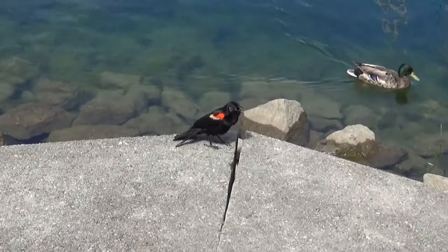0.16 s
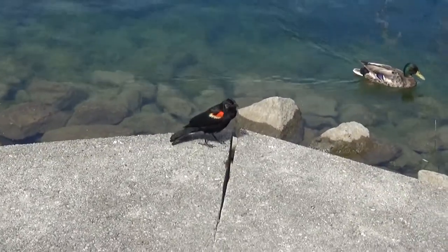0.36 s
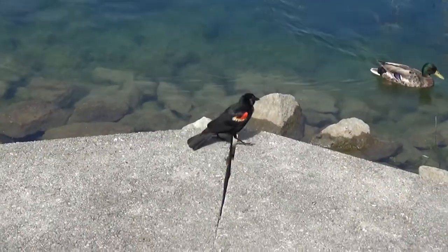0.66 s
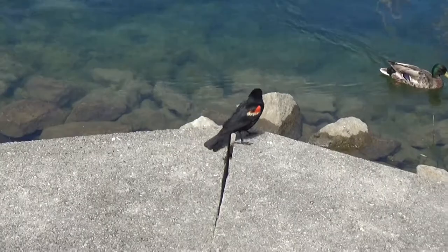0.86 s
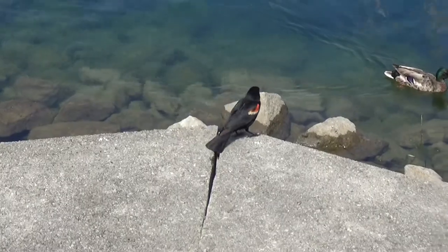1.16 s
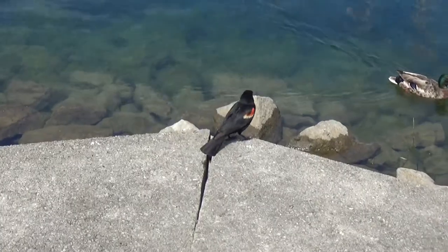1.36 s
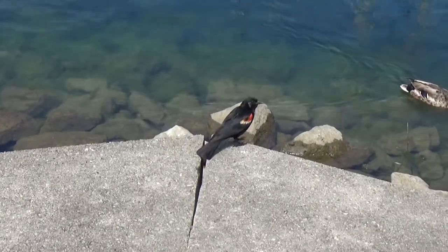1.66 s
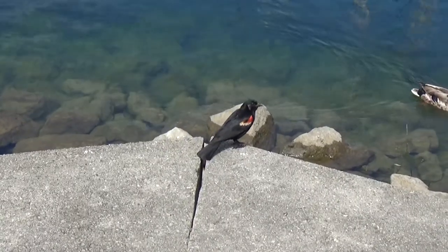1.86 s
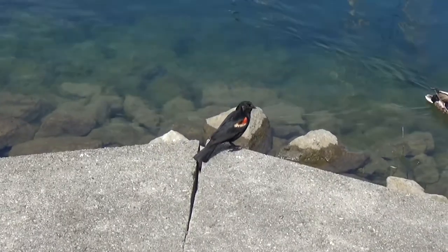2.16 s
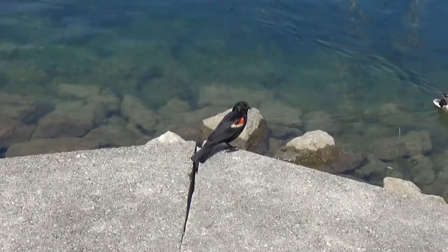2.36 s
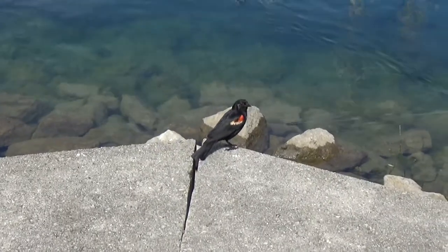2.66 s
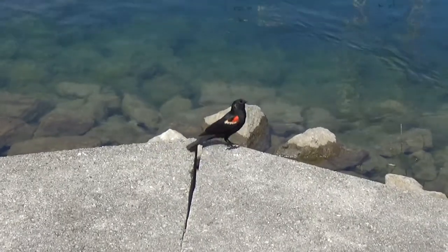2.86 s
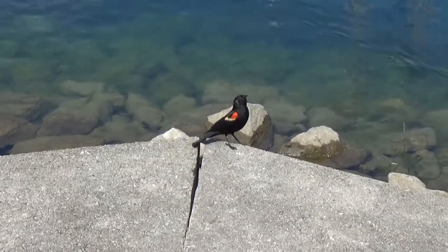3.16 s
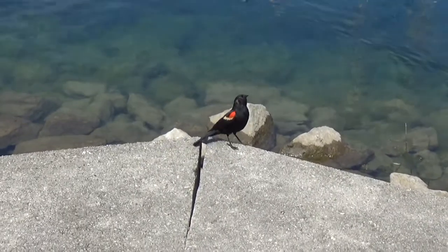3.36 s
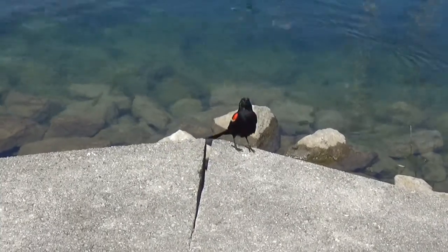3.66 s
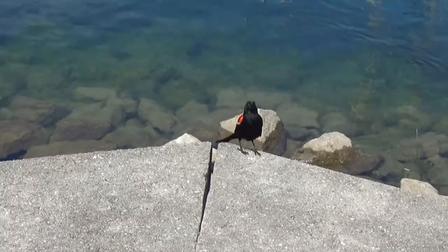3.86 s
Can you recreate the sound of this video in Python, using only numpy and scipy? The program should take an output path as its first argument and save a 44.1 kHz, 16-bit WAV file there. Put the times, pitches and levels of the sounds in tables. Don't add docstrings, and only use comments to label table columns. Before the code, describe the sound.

A close blackbird's loud, metallic buzzing trill is already under way and stops within a quarter second, echoing briefly off stone; afterwards quiet far traffic rumble, soft wind bumps, faint chirps and small laps, on a small camera microphone.

```python
import sys
import numpy as np
from scipy import signal
from scipy.fft import rfft, irfft
from scipy.io import wavfile
from scipy.ndimage import uniform_filter1d

SR = 44100
rng = np.random.default_rng(int(sys.argv[2]) if len(sys.argv) > 2 else 0)


def waveform_to_disk(signal):
    frames = np.transpose(np.atleast_2d(signal))
    scaled = np.clip(frames, -1, 1) * 32767
    samples = np.round(scaled).astype(np.int16)
    wavfile.write(sys.argv[1], SR, samples)


def linear_from_db(decibels):
    return 10 ** (np.asarray(decibels, float) / 20)


N = 176400
LEAD_S = 0.3


def evened(x):
    return x / np.sqrt(np.mean(x ** 2) + 1e-20)


def read(points, hz):
    f, value = np.transpose(points)
    return np.interp(np.log(hz + 1), np.log(f + 1), value)


def add(mix, s, sound):
    at = round(s * SR)
    sound = sound[..., max(-at, 0):]
    part = mix[..., max(at, 0):][..., :sound.shape[-1]]
    part += sound[..., :part.shape[-1]]


def panned(x, side_db):
    return x * linear_from_db(np.array([[side_db], [-side_db]]))


def resonate(x, hz, width_hz):
    turn = np.exp(2j * np.pi * hz * np.arange(x.shape[-1]) / SR)
    r = np.exp(-np.pi * width_hz / SR)
    return 2 * (turn * signal.lfilter([1 - r], [1, -r], x / turn)).real


def resonate_twice(x, hz, width_hz):
    return resonate(resonate(x, hz, width_hz), hz, width_hz)


def whistle(length_s, from_hz, to_hz, level_db, partials_db, bend, edge, rough):
    u = np.linspace(0, 1, max(round(length_s * SR), 8))
    glide_hz = to_hz + (from_hz - to_hz) * (1 - u) ** bend
    phase = 2 * np.pi * (np.cumsum(glide_hz) / SR + rng.random())
    noise = evened(uniform_filter1d(rng.standard_normal(2000), size=40))
    flutter = 1 + rough * noise[np.arange(len(u)) % 2000]
    shape = np.sin(np.pi / 2 * np.clip(np.minimum(u, 1 - u) / edge, 0, 1)) ** 2
    tone = sum(linear_from_db(db) * np.cos((k + 1) * phase) for k, db in enumerate(partials_db))
    return linear_from_db(level_db) * shape * flutter * tone


# [t/s, effort/dB]
TRILL_FIGURES = [(-.0214, 0), (0.0, 0), (.0213, 0), (.0428, 0), (.0643, 0), (.0858, -.5), (.1073, -.5),
                 (.1288, -.5), (.15, 0), (.1702, -.5), (.1903, -.5), (.2088, -1.5), (.227, -99)]
# [start/share, length/share, from f/Hz, to f/Hz, level/dB]
WHISTLED_NOTES = [
    (.25, .2, 5150, 3500, -12),
    (.41, .13, 3300, 4200, -18),
    (.46, .175, 2420, 3900, -10.5),
    (.52, .14, 4300, 5000, -21),
    (.565, .29, 2650, 3000, -15),
    (.62, .17, 5850, 6100, -30),
    (.735, .19, 5550, 3400, -10.5),
]
# [start/share, length/share, from f/Hz, to f/Hz, level/dB]
REEDY_NOTE = (-.16, .54, 1605, 1670, -19)
REEDY_PARTIALS = [-21.5, -3, 0, -42]
WHISTLE_PARTIALS = [0, -33, -46.5]
# [f/Hz, level/dB]
THROAT_GAIN = [(1400, -8), (1600, 0), (1760, 0), (1980, -9), (2400, 0), (5350, 1), (5600, -4), (5900, 0)]
# [f/Hz, level/dB per Hz]
BEAK_AIR = [(6300, 4.5), (8000, 0), (10100, 6.5), (12400, -19.5), (14500, -3.5)]


def trill():
    period_s, jitter_db, pitch_jitter = 0.0214, 0.9, 0.012
    close_s, close_db_per_s, rasp_db = 0.2125, -1600, -47.5
    first_s, first_db = TRILL_FIGURES[0]
    rows = [(first_s - k * period_s, first_db) for k in range(12, 0, -1)] + list(TRILL_FIGURES)
    notes = [(REEDY_NOTE, REEDY_PARTIALS)] + [(note, WHISTLE_PARTIALS) for note in WHISTLED_NOTES]
    out = np.zeros(SR)
    for (start, effort_db), (end, _) in zip(rows, rows[1:]):
        span = end - start
        for (at, share, from_hz, to_hz, db), partials in notes:
            pitch, force = rng.standard_normal(2)
            tune = 1 + pitch_jitter * pitch
            level_db = db + effort_db + jitter_db * force
            note = whistle(share * span, from_hz * tune, to_hz * tune, level_db, partials,
                           bend=1.8, edge=0.4, rough=0.12)
            add(out, LEAD_S + start + at * span, note)
    hz = np.fft.rfftfreq(SR, 1 / SR)
    out = irfft(rfft(out) * linear_from_db(read(THROAT_GAIN, hz)))
    band = (hz > 6300) & (hz < 15100)
    air = evened(irfft(rfft(rng.standard_normal(SR)) * linear_from_db(read(BEAK_AIR, hz)) * band))
    push = np.sqrt(abs(uniform_filter1d(out ** 2, size=100)))
    out += linear_from_db(rasp_db) * air * push / np.sqrt(np.mean(push[:SR // 2] ** 2))
    t = np.arange(SR) / SR - LEAD_S
    return out * linear_from_db(close_db_per_s * np.maximum(t - close_s, 0))


# [delay t/s, left level/dB, right level/dB]
STONE_ECHOES = [
    (.003, -12.5, -13.5),
    (.0052, -12.5, -13),
    (.0078, -17, -11.5),
    (0.0131, -10, -19),
    (.017, -21.5, -14),
    (0.023, -28, -30.5),
]
# [f/Hz, level/dB]
BANK_COLOUR = [(2000, -3), (2600, 7), (3000, 3.5), (3600, 1.5), (4400, -1.5), (5000, 2), (5700, -10.5)]


def shore(x):
    tail_db, t60_s = -28.5, 0.94
    taps = np.zeros((2, SR))
    at = np.arange(900, SR - 20, 20) + rng.integers(0, 20, (2, (SR - 901) // 20))
    np.put_along_axis(taps, at, rng.choice([-1., 1.], at.shape), 1)
    taps *= linear_from_db(-60 * np.arange(SR) / SR / t60_s)
    colour = linear_from_db(read(BANK_COLOUR, np.fft.rfftfreq(SR, 1 / SR)) + tail_db)
    taps = irfft(rfft(taps) * colour) / np.linalg.norm(taps[0])
    taps[:, 0] += 1
    for s, left_db, right_db in STONE_ECHOES:
        taps[:, round(s * SR)] += linear_from_db(np.array([left_db, right_db]))
    wet = signal.fftconvolve(x[None], taps, axes=1)[:, round(LEAD_S * SR):]
    return np.pad(wet, [(0, 0), (0, N - wet.shape[1])])


# [f/Hz, level/dB per Hz]
BED_SPECTRUM = [(12, -28.5), (20, -15.5), (85, 1.5), (246, -5), (537, -15.5), (888, -20), (3890, -35.5),
                (8040, -38.5), (15700, -45.5)]
# [f/Hz, share]
LIKENESS = [(30, .98), (60, .95), (130, .945), (290, .985), (480, .9), (950, .66), (1900, .47), (3800, .35),
            (7500, .68), (9000, .8)]
# [t/s, level/dB]
LOW_SWELL = [(0, -48), (.2, -43), (.42, -38.5), (.8, -40), (1.099, -41.5), (1.35, -41.5), (1.55, -40.5),
             (1.8, -41.5), (2.3, -42.5), (2.9, -43.5), (3.3, -42), (4, -42.5)]
# [f/Hz, share]
LOW_SWELL_SHARE = [(60, 1.93), (300, 0.48), (1000, 0.1), (4000, 0.036)]
# [t/s, roar level/dB, hiss level/dB]
ROAR_HISS_SWELL = [(0, -3, 0), (.15, 2.5, 0.5), (0.401, 3, -2.5), (.65, -1.5, 0), (1.1, 0, 0.5),
                   (1.9, 2, 0), (2.399, -0.5, 0), (2.9, -1, -1), (3.101, 0, -2.5), (3.45, 2, -1.5),
                   (3.7, 2, -0.5), (4, 1, 0.5)]
# [f/Hz, share]
ROAR_SHARE = [(250, 0), (400, 1), (900, 1), (1400, 0)]
# [f/Hz, share]
HISS_SHARE = [(900, 0), (1800, 1)]


def wash():
    level_db, patch_db, flicker_db = -40.5, 0.8, 0.52
    frames, hz = N // 256 + 5, np.fft.rfftfreq(1024, 1 / SR)
    a, b, c, d, patches = rng.standard_normal((frames, 513, 5)).T
    patches = evened(uniform_filter1d(uniform_filter1d(patches, size=12, axis=0), size=10, axis=1))
    flicker = evened(uniform_filter1d(rng.standard_normal(frames), size=4))
    t = np.arange(frames) * 256 / SR
    s, db = np.transpose(LOW_SWELL)
    swell_db = np.interp(t, s, db - db.mean())
    s, roar_db, hiss_db = np.transpose(ROAR_HISS_SWELL)
    gain_db = read(BED_SPECTRUM, hz)[:, None] + patch_db * patches + flicker_db * flicker
    gain_db += read(LOW_SWELL_SHARE, hz)[:, None] * swell_db
    gain_db += read(ROAR_SHARE, hz)[:, None] * np.interp(t, s, roar_db)
    gain_db += read(HISS_SHARE, hz)[:, None] * np.interp(t, s, hiss_db)
    same = np.clip(read(LIKENESS, hz), -1, 1)[:, None]
    left = a + 1j * b
    right = same * left + np.sqrt(1 - same ** 2) * (c + 1j * d)
    z = np.array([left, right]) * linear_from_db(gain_db)
    return linear_from_db(level_db) * evened(signal.istft(z, nperseg=1024, noverlap=768)[1][:, :N])


# [f/Hz, width f/Hz, level/dB]
ENGINE_DRONES = [
    (83.4, 62, -51.5),
    (256.5, 43, -52),
    (395.8, 46, -56),
]


def drones():
    side_share = 0.13
    out = np.zeros((2, N))
    for hz, width_hz, db in ENGINE_DRONES:
        mid, side = rng.standard_normal((2, N))
        noise = mid + side_share * np.array([side, -side])
        out += linear_from_db(db) * evened(resonate_twice(noise, hz, width_hz))
    return out


def camera():
    ticks_per_s, first_s, tick_s = 29.97, 0.0225, 0.011
    tick_hz, spread_hz, tick_db, spread_db = 2850, 70, -65, 2.5
    whine_hz, width_hz, whine_db = 7900, 71, -74
    out = linear_from_db(whine_db) * evened(resonate(rng.standard_normal((2, N)), whine_hz, width_hz))
    for k, (pitch, force) in enumerate(rng.standard_normal((120, 2))):
        hz = tick_hz + spread_hz * pitch
        tick = whistle(tick_s, hz, hz, tick_db + spread_db * force, [0], bend=1, edge=0.13, rough=0.7)
        add(out, first_s + k / ticks_per_s, panned(tick, 1.1))
    return out


# [t/s, length t/s, from f/Hz, to f/Hz, level/dB]
FAR_CHIRPS = [(0.483, 0.0236, 4970, 3990, -60.5), (.497, 0.017, 8700, 8500, -65),
              (0.548, .02, 8440, 8600, -64), (0.545, 0.018, 3600, 4160, -60.5),
              (0.588, 0.021, 8400, 8600, -69), (.775, 0.019, 8250, 8150, -61),
              (1.015, 0.032, 3790, 4170, -62), (1.387, 0.022, 4150, 4110, -61),
              (1.425, 0.029, 3320, 3990, -65), (1.478, .015, 3990, 4200, -63),
              (1.738, 0.014, 3600, 4100, -59), (1.75, .012, 4210, 3800, -57),
              (1.743, 0.016, 4520, 4560, -58), (1.917, 0.061, 2900, 2900, -57),
              (1.948, 0.14, 3050, 3010, -59.5), (2.274, 0.014, 3780, 3900, -63),
              (2.358, 0.024, 4910, 3950, -58), (2.416, 0.0187, 3900, 4170, -61.5),
              (2.425, 0.035, 3600, 2520, -66), (2.727, 0.026, 1900, 2644, -54.5),
              (2.74, 0.02, 3680, 4800, -56), (2.801, 0.032, 2932, 2900, -61), (2.86, .05, 1976, 1940, -58),
              (2.834, .02, 2000, 1994, -61), (3.393, 0.021, 3310, 3350, -61),
              (3.621, 0.03, 6660, 6690, -62.5)]
# [t/s, length t/s, from f/Hz, to f/Hz, level/dB]
FAR_WARBLES = [(1.04, 0.039, 4130, 3580, -63), (1.045, .035, 4560, 4570, -70),
               (1.18, 0.017, 2754, 2500, -54), (1.205, .02, 2800, 2750, -63),
               (1.225, .045, 2350, 2600, -59), (1.275, 0.029, 2330, 2610, -62),
               (1.45, .022, 3340, 3410, -61), (1.445, .014, 4120, 4120, -63), (1.685, .02, 2300, 2360, -55),
               (1.7, 0.038, 3340, 3400, -63), (1.92, .016, 3770, 3800, -65), (1.99, .06, 2350, 2250, -61),
               (2.06, .035, 2900, 2750, -57), (2.1, .028, 3870, 3900, -60), (2.225, .016, 3290, 3340, -65),
               (2.298, 0.026, 3920, 3900, -63), (2.385, 0.012, 3750, 4020, -62),
               (2.405, .016, 3640, 3600, -63)]
# [t/s, length t/s, from f/Hz, to f/Hz, level/dB]
THIN_PEEPS = [
    (3.595, .02, 5500, 5500, -65),
    (3.675, .02, 3800, 4400, -63),
    (3.66, .035, 5100, 5000, -64),
    (3.737, .014, 8700, 8800, -63),
    (3.82, .03, 8600, 8600, -66),
    (3.655, .02, 3700, 3800, -65),
    (3.775, .014, 8700, 8750, -67),
]


def distant_calls():
    out = np.zeros((2, N))
    for table in (FAR_CHIRPS, FAR_WARBLES, THIN_PEEPS):
        for s, length_s, from_hz, to_hz, db in table:
            call = whistle(length_s, from_hz, to_hz, db, [0], bend=0.93, edge=0.16, rough=0.61)
            add(out, s, panned(call, rng.uniform(-4.5, 2.3)))
    return out


# [peak t/s, peak level/dB, f/Hz]
WIND_BUMPS = [
    (.679, -27, 75),
    (.94, -30, 100),
    (.99, -34, 120),
    (1.035, -29, 90),
    (1.128, -30, 85),
    (1.75, -33, 60),
    (2.95, -33, 90),
]


def bumps():
    cycles = 2.15
    out = np.zeros(N)
    for s, db, hz in WIND_BUMPS:
        u = np.linspace(0, 1, round(cycles * SR / hz))
        bump = np.sin(np.pi * u) ** 2 * np.sin(2 * np.pi * cycles * u)
        add(out, s - cycles / hz / 2, linear_from_db(db) * bump)
    return out


def lap(length_s, level_db, bright_hz, pan_db):
    pops_per_s, spread_db, low_hz, cycles = 4800, 0.5, 1288, 3
    n = round(length_s * SR)
    out, kinds_hz = np.zeros((2, n)), np.geomspace(low_hz, bright_hz, num=24)
    for hz in kinds_hz:
        u = np.linspace(0, 1, round(cycles * SR / hz))
        bubble = np.sin(np.pi * u ** 0.79) ** 2 * np.sin(2 * np.pi * cycles * (u + 0.36 * u ** 2))
        pops = rng.random((2, n)) < pops_per_s / SR / len(kinds_hz)
        pops = pops * linear_from_db(spread_db * rng.exponential(size=(2, n)))
        pops = pops + 0.22 * pops[::-1]
        out += linear_from_db(2.2 * rng.standard_normal()) * signal.oaconvolve(pops, bubble[None], axes=1)[:, :n]
    shape = np.sin(np.pi * np.linspace(0, 1, n) ** 0.71) ** 0.83
    return panned(evened(out) * shape * linear_from_db(level_db), pan_db / 2)


# [t/s, length t/s, level/dB, brightness f/Hz, pan/dB]
SMALL_WAVES = [
    (0.71, 0.12, -51, 8500, -2.5),
    (1.168, 0.16, -56.5, 3830, 4),
    (1.672, 0.17, -55.5, 3970, -1),
    (1.885, 0.12, -50.5, 6000, -1.5),
    (1.956, 0.25, -53.5, 7350, -1),
    (2.69, 0.12, -55, 6950, -6),
    (2.782, 0.16, -58.5, 7100, -4),
    (3.482, 0.074, -56, 10000, -8),
    (3.63, 0.083, -60, 8760, -1.5),
    (3.86, 0.11, -59, 11600, 0.5),
]


def waves():
    out = np.zeros((2, N))
    for s, *row in SMALL_WAVES:
        add(out, s, lap(*row))
    return out


# [t/s, level/dB, centre f/Hz, width f/Hz]
DROP_CLICKS = [
    (1.202, -57, 1900, 400),
    (1.858, -58, 2000, 1500),
    (2.259, -58, 3000, 1300),
    (2.5925, -49, 900, 900),
    (2.5935, -52, 2000, 1200),
    (2.5935, -57, 5000, 2500),
    (2.598, -54, 1700, 900),
    (3.362, -55, 2900, 900),
    (3.428, -62, 2900, 700),
]


def drops():
    out = np.zeros((2, N))
    k = np.arange(400)
    shape = np.minimum(k / 46, 1) * linear_from_db(-5000 * k / SR)
    for s, db, hz, width_hz in DROP_CLICKS:
        puff = rng.standard_normal(400) * shape
        add(out, s, panned(linear_from_db(db) * evened(resonate_twice(puff, hz, width_hz)), 0))
    return out


# [t/s, length t/s, level/dB]
CHUCK_CALL = (3.485, 0.046, -46)
# [f/Hz, width f/Hz, level/dB]
CHUCK_RESONANCES = [(2330, 380, 5), (1900, 400, -3), (2900, 550, -12), (3400, 250, -4)]


def chuck():
    out = np.zeros((2, N))
    s, length_s, db = CHUCK_CALL
    breath = rng.standard_normal(round(length_s * SR))
    voice = sum(linear_from_db(g) * resonate_twice(breath, hz, width_hz) for hz, width_hz, g in CHUCK_RESONANCES)
    shape = np.sin(np.pi * np.linspace(0, 1, len(voice)))
    add(out, s, panned(linear_from_db(db) * evened(voice) * shape, 0))
    return out


def scene():
    bed = wash() + drones() + camera()
    events = distant_calls() + bumps() + waves() + drops() + chuck()
    return shore(trill()) + bed + events


def top_cut(x):
    return signal.sosfilt(signal.butter(12, 16130, fs=SR, output="sos"), x)


def record(dry):
    square_db, cube_db, overload_hz, side_top_hz = -21, -30, (6300, 15100), 9200
    bent = linear_from_db(square_db) * dry ** 2 + linear_from_db(cube_db) * dry ** 3
    x = dry + signal.sosfilt(signal.butter(8, overload_hz, "band", fs=SR, output="sos"), bent)
    side_filter = signal.butter(4, side_top_hz, fs=SR, output="sos")
    side = signal.sosfiltfilt(side_filter, (x[0] - x[1]) / 2)
    return top_cut(x.mean(0) + np.array([side, -side]))


dry = scene()
out = record(dry)
waveform_to_disk(out)
```